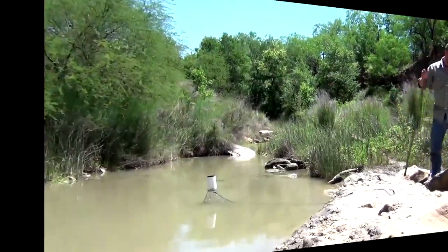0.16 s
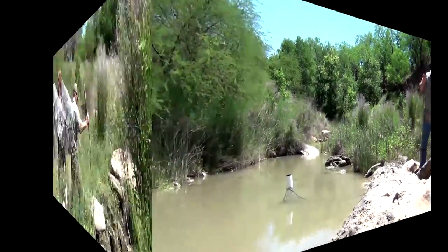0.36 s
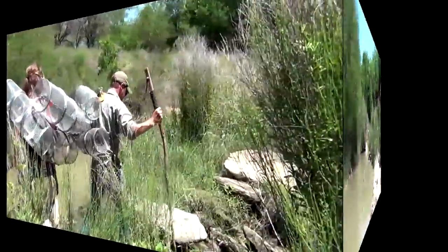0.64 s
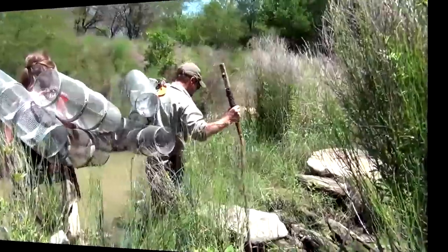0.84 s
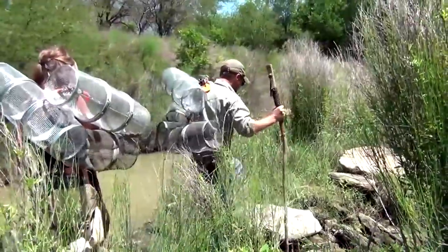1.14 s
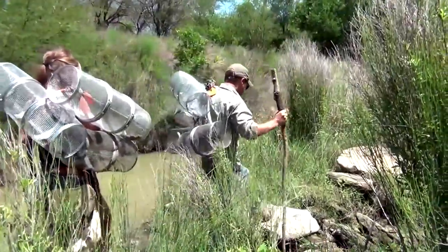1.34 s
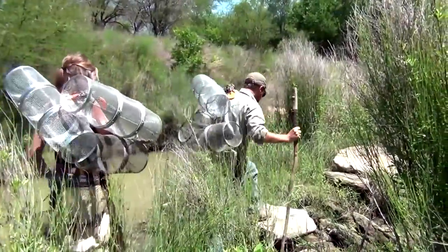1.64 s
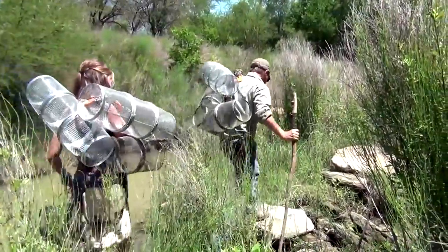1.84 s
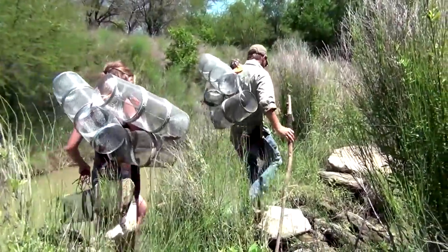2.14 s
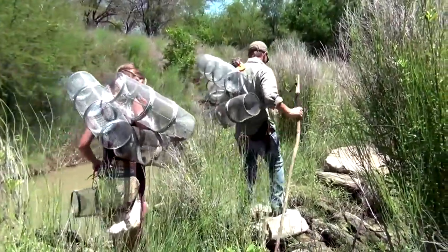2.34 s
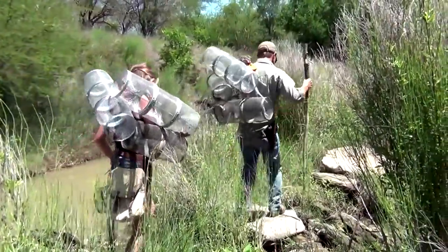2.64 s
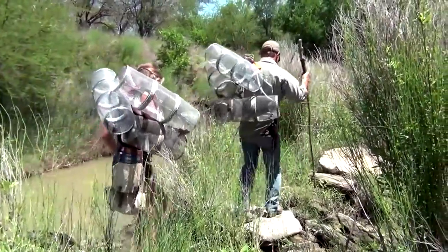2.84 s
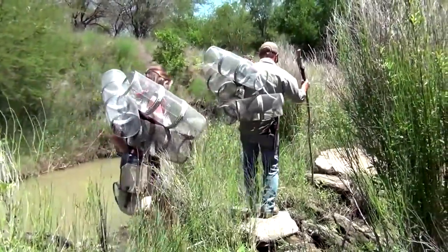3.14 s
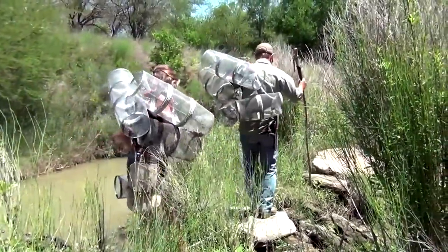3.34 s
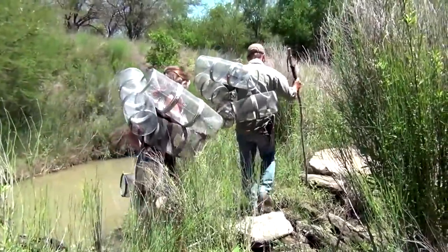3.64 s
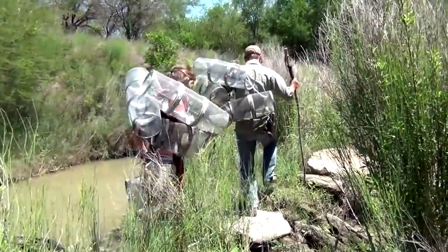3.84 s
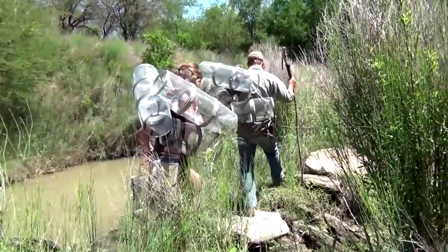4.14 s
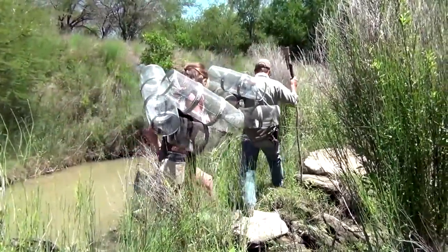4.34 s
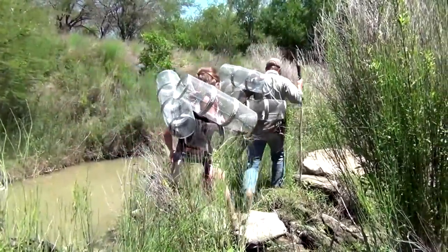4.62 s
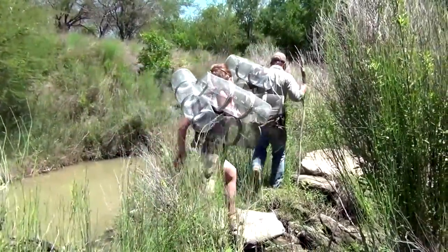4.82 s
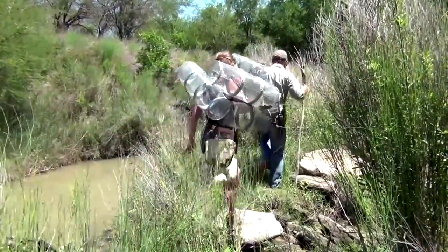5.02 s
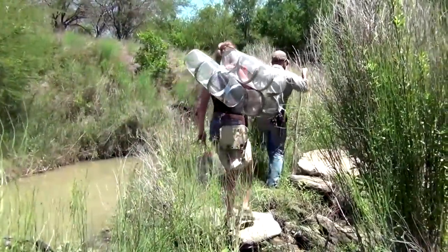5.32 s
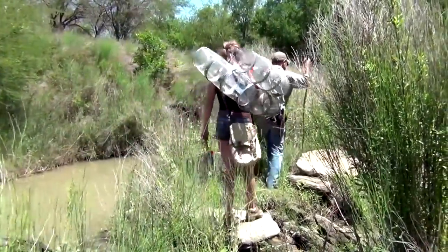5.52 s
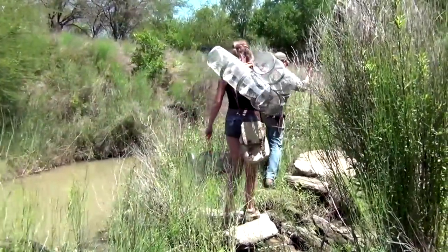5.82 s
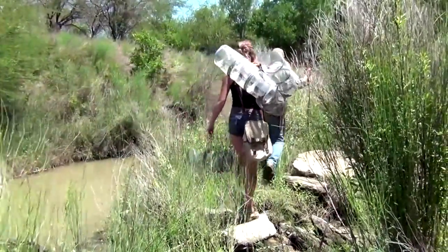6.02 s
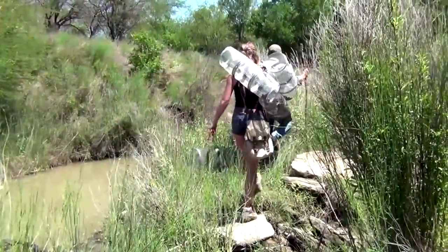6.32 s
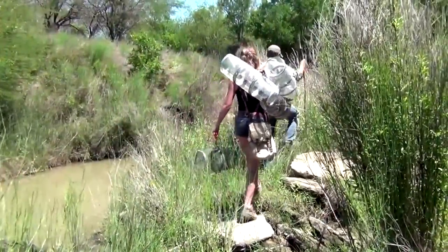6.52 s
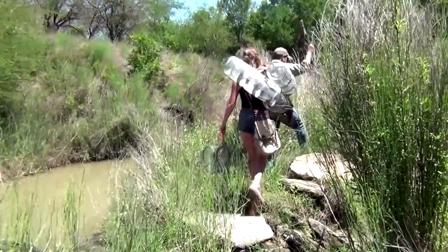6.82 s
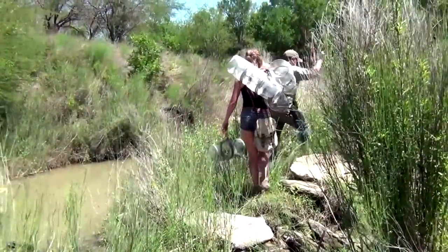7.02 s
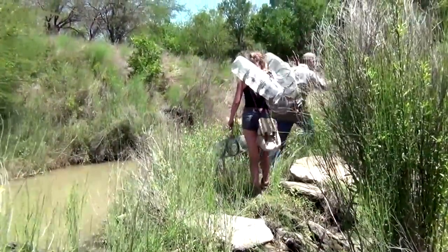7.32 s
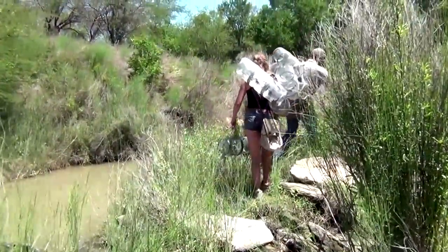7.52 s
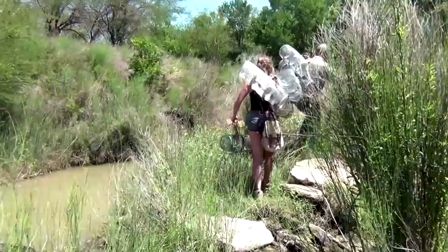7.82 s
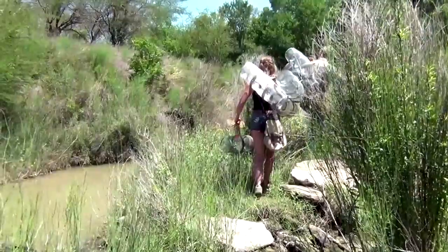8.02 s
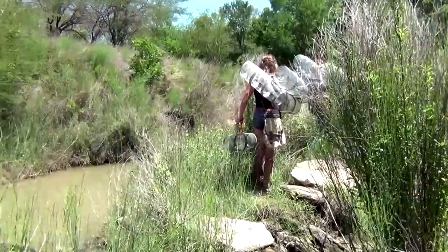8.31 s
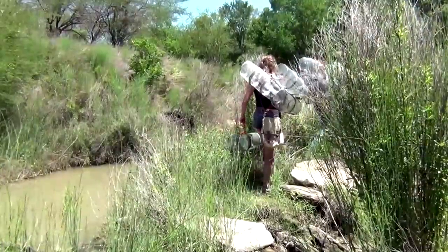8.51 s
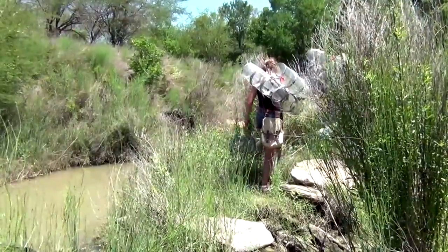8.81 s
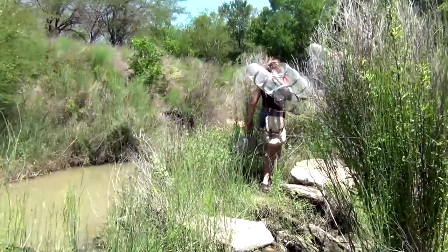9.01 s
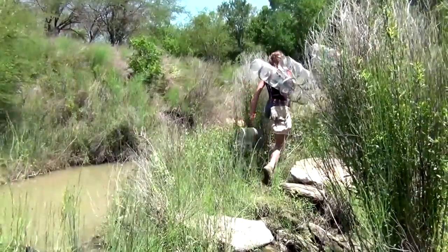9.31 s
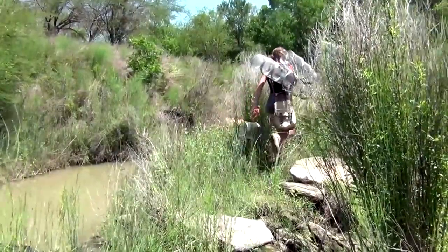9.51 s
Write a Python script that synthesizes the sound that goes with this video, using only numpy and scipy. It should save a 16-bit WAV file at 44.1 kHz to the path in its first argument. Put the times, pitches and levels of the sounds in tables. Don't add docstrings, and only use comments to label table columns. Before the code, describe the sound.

Tall grass rustles and dry twigs crack as people carrying wire traps walk away beside quietly trickling water, with light knocks and faint wind.

```python
import sys
import numpy as np
from scipy import signal
from scipy.fft import rfft, irfft
from scipy.io import wavfile
from scipy.ndimage import uniform_filter1d

SR = 44100
rng = np.random.default_rng(int(sys.argv[2]) if len(sys.argv) > 2 else 0)


def wrap_up_sound(samples):
    columns = np.atleast_2d(samples).T
    tamed = np.clip(columns, -1, 1)
    steps = np.round(tamed * 32767).astype(np.int16)
    wavfile.write(sys.argv[1], SR, steps)


def decibels_to_gain(level_db):
    exponent = np.asarray(level_db, float) / 20
    return 10 ** exponent


N = 425873


def evened(x):
    return x / np.sqrt(np.mean(x ** 2) + 1e-20)


def read(points, hz):
    f, value = np.transpose(points)
    return np.interp(np.log(hz + 1), np.log(f + 1), value)


def curve(rows, axis=1):
    rows = np.array(rows)
    return np.interp(np.arange(N) / SR, rows[:, 0], rows[:, axis])


def lumps(rows):
    t = np.arange(N) / SR
    return sum(decibels_to_gain(db) * np.cos(np.pi * np.clip((t - s) / length, -.5, .5)) ** 2 for s, db, length in rows)


def add(mix, s, sound):
    part = mix[:, round(s * SR):][:, :sound.shape[1]]
    part += sound[:, :part.shape[1]]


def resonate(x, hz, width):
    r = np.exp(-np.pi * width / SR)
    pole = r * np.exp(2j * np.pi * hz / SR)
    return 2 * signal.lfilter([1 - r], [1, -pole], x).real


def coloured(x, spectrum):
    gain = decibels_to_gain(read(spectrum, np.fft.rfftfreq(N, 1 / SR)))
    return evened(irfft(rfft(x) * gain, N))


# (frequency [Hz], likeness [0-1])
PORT_LIKENESS = [(60, 0.67), (180, 0.53), (550, 0.42), (1650, 0.55), (4970, 0.46), (15000, 0.73)]


def hiss(spectrum, size, patch_db, flicker_db):
    frames, hz = 4 * N // size + 5, np.fft.rfftfreq(size, 1 / SR)
    a, b, c, d, patches = rng.standard_normal((frames, len(hz), 5)).T
    patches = uniform_filter1d(patches, size=12, axis=0)
    patches = evened(uniform_filter1d(patches, size=14, axis=1))
    flicker = uniform_filter1d(rng.standard_normal(frames), size=9)
    flicker = evened(uniform_filter1d(flicker, size=9))
    same = np.clip(read(PORT_LIKENESS, hz), -1, 1)[:, None]
    left = a + 1j * b
    right = same * left + np.sqrt(1 - same ** 2) * (c + 1j * d)
    z = np.array([left, right])
    z *= decibels_to_gain(read(spectrum, hz)[:, None] + patch_db * patches + flicker_db * flicker)
    return evened(signal.istft(z, nperseg=size, noverlap=3 * size // 4)[1][:, :N])


def grains(per_s, spread_db, low_hz, high_hz, cycles, glide):
    size = decibels_to_gain(spread_db * np.minimum(rng.exponential(1, N), 4)) * (rng.random(N) < per_s / SR)
    kind, side = rng.integers(0, 24, N), rng.uniform(-.6, .6, N)
    out = np.zeros((2, N))
    for k, hz in enumerate(np.geomspace(low_hz, high_hz, 24)):
        u = np.arange(0, 4 * cycles, hz / SR) / cycles
        chirp = u * np.exp(-2 * u) * np.sin(2 * np.pi * cycles * (u + glide * u ** 2))
        starts = size * (kind == k) * np.array([1 - side, 1 + side])
        out += signal.oaconvolve(starts, chirp[None], axes=1)[:, :N]
    return evened(out)


def blow(peak_db, rings_hz, t60, breadth, crack, rise_s):
    t = np.arange(int(.25 * SR)) / SR
    shared, own = rng.standard_normal(len(t)), rng.standard_normal((2, len(t)))
    noise = (np.sign(shared) + .5 * own) * decibels_to_gain(-60 * t / t60) * (1 - np.exp(-t / rise_s))
    noise = signal.lfilter(*signal.butter(2, 0.42 * min(rings_hz), "high", fs=SR), noise)
    centre = np.mean(rings_hz)
    wide = resonate(resonate(noise, centre, 1.85 * centre), rings_hz[0], 1.7 * centre)
    burst = crack * evened(wide)
    for k, hz in enumerate(rings_hz):
        burst = burst + evened(resonate(wide, hz, breadth * hz)) * 0.67 ** k
    return decibels_to_gain(peak_db) * burst / abs(burst.mean(0)).max()


# (middle [s], rms level [dB], length [s])
SWEEPS = [(0.104, -43, 0.16), (0.927, -44.5, 0.19), (1.712, -41.5, 0.066), (1.885, -41, 0.045),
          (2.02, -43, 0.09), (3.096, -38.5, 0.037), (3.161, -38.5, .04), (3.55, -40, 0.06),
          (3.775, -38.5, .04), (4.885, -39.5, .04), (3.72, -34.5, 0.035), (4.173, -39.5, 0.051),
          (4.371, -36.5, 0.1), (4.49, -39.5, 0.1), (4.922, -40, .025), (4.97, -39, .04),
          (5.011, -39.5, 0.04), (5.416, -45, 0.25), (6.308, -39, 0.018), (6.421, -39, 0.016),
          (6.533, -36.5, 0.075), (6.585, -38, 0.035), (6.7, -35.5, 0.022), (7.18, -28.5, 0.015),
          (7.435, -33.5, 0.13), (7.732, -33, 0.1), (8.278, -46, 0.36), (8.86, -42, 0.27),
          (8.996, -38.5, 0.16), (9.214, -44.5, 0.037), (9.367, -38.5, 0.1), (9.455, -39, 0.047),
          (9.536, -35, 0.032), (9.597, -38.5, 0.048)]
# (middle [s], rms level [dB], length [s])
SURGES = [(2.8, -47, .05), (2.91, -45, .06), (2.97, -44, .05), (3.05, -41, .04), (3.26, -44, .1),
          (3.46, -43, .05), (3.62, -43, .05), (3.685, -40, .025), (3.83, -41, .06), (3.95, -39, .1),
          (4.06, -42, .08), (4.32, -43, .06), (4.63, -39, .06), (4.78, -43, .05), (5.11, -44, .03),
          (6.212, -41, .012), (6.55, -45, .05)]


def tufts(blades):
    mix = np.zeros((2, N))
    blades = np.roll(blades, SR // 20, axis=1)
    for rows, hz in [(SWEEPS, 9300), (SURGES, 5200)]:
        for s, db, length in rows:
            start = round((s - 0.42 * length) * SR)
            tuft = blades[:, start:][:, :round(length * SR)]
            tuft = evened(resonate(tuft, hz, 0.77 * hz) + .3 * tuft)
            swell = np.sin(np.pi * np.linspace(0, 1, tuft.shape[1]) ** 0.71) ** 2
            add(mix, start / SR, decibels_to_gain(db) * tuft * swell)
    return mix


# (time [s], effort level [dB], dryness of the blades met [0-1])
GRASS = [(0, -45, 1), (1.0, -46.5, 0.4), (1.4, -47, 0.75), (2.7, -47, 0.4), (2.95, -42.5, 0),
         (3.41, -43, 0.3), (3.8, -39.5, 0), (4.3, -39, 0.2), (4.62, -36.5, 0.82), (5.0, -40, 1),
         (5.5, -47.5, 0.28), (6.0, -47.5, 0.66), (6.4, -42.5, 0.98), (6.94, -44, 0.65), (7.32, -36.5, 0.87),
         (7.83, -45.5, 0.8), (8.5, -52, 0.53), (9.66, -42, 0.6)]
# (frequency [Hz], level [dB per Hz])
BLADES = [(880, -15.5), (1500, -4.5), (2860, -3), (3450, -5.5), (4290, -4), (7170, -3.5), (8660, -3),
          (12200, -10), (13400, -26), (14900, -25), (16000, -36)]
# (frequency [Hz], level [dB per Hz])
STALKS = [(1200, -25), (1900, -19), (2300, 1), (2520, 3.5), (2900, 0.5), (3300, -0.5), (5000, -20.5)]
# (frequency [Hz], level [dB per Hz])
SIZZLE = [(8000, -36), (11000, -2.5), (13000, 4), (15500, -2), (16500, -30)]


def grass():
    crackle = coloured(grains(1500, 0.91, 2530, 12600, 2.54, .0),
                       [(1500, -21), (4000, 1), (9000, 10.0), (12000, 6.0), (15000, -14)])
    fine = evened(hiss(BLADES, size=256, patch_db=2.0, flicker_db=1.3) + .5 * crackle)
    effort_db, dryness = curve(GRASS), curve(GRASS, axis=2)
    stalk_db = -4 - 12.5 * dryness - 0.49 * (effort_db + 46)
    sizzle_db = -21.5 + 11.5 * dryness - 0.23 * (effort_db + 46)
    coarse = decibels_to_gain(stalk_db) * hiss(STALKS, size=256, patch_db=-1.0, flicker_db=1.5)
    sizzle = hiss(SIZZLE, size=256, patch_db=1.5, flicker_db=2.2)
    thinned = fine - 0.35 * dryness ** 2 * resonate(fine, 3840, 3900)
    fade_in = np.minimum(np.arange(N) / SR / 0.078, 1) ** 2
    steady = decibels_to_gain(effort_db) * (thinned + coarse + decibels_to_gain(sizzle_db) * sizzle) * fade_in
    return steady + tufts(fine + 0.052 * crackle + 0.33 * sizzle)


# (time [s], peak level [dB], ring [Hz])
TICKS = [(0.2754, -30, 9220), (0.3925, -20, 5740), (1.5234, -28, 4620), (1.5833, -30, 5140),
         (3.0944, -27, 6450), (3.2251, -31, 6550), (3.3243, -30, 7690), (3.6282, -30, 6250),
         (3.8124, -27, 6410), (4.1649, -27, 9780), (4.372, -25, 9910), (4.4444, -24, 6940),
         (4.4774, -26, 6140), (4.5994, -27, 6220), (4.9631, -26, 9000), (5.0104, -29, 8490),
         (5.1048, -36, 6120), (6.3051, -25, 8590), (6.4214, -24, 7170), (6.5151, -25, 9090),
         (6.577, -24, 12100), (6.5869, -25, 5410), (6.6164, -26, 8000), (6.6314, -32, 9790),
         (7.7044, -27, 8880), (7.7284, -23, 11600), (7.7404, -23, 5530), (7.7534, -24, 6520),
         (8.9944, -23, 8770)]


def springing_blades():
    mix = decibels_to_gain(curve(GRASS) - 11) * grains(600, 3.2, 5000, 12000, 1.6, .0)
    for s, db, hz in TICKS:
        add(mix, s, blow(db - 2.5, [hz], .008, breadth=.1, crack=1.5, rise_s=.0002))
    return mix


def pop(peak_db, hz, t60):
    t = np.arange(int(.02 * SR)) / SR
    ring = np.sin(2 * np.pi * hz * t) * decibels_to_gain(peak_db - 60 * t / t60) * np.minimum(2 * hz * t, 1)
    left, right = ring + 0.17 * np.roll(ring, 31), ring + 0.54 * np.roll(ring, 38)
    return np.array([left, right]) * decibels_to_gain([[-2.2], [1.1]])


# (time [s], peak level [dB], ring [Hz])
SNAPS = [(0.1114, -28, 10900), (0.2884, -31, 4150), (0.3930, -26, 10000), (0.5886, -28, 6430),
         (3.684, -39, 9760), (3.8367, -24, 8570), (4.472, -22, 11000), (5.1054, -29, 6130),
         (6.269, -31, 10100), (6.3722, -26, 11900), (6.4047, -27, 10500), (6.4147, -24, 9500),
         (6.6915, -21, 8000), (6.9711, -35, 5680),
         (7.1322, -25, 8630), (7.1924, -29, 7960), (7.3564, -25, 6210), (7.3904, -28, 8830),
         (7.4051, -18, 9130), (7.416, -20.5, 9370), (7.6985, -22, 8000), (7.855, -32, 9130),
         (8.2815, -28, 9960), (8.6682, -30, 11600), (8.738, -32, 10700), (9.001, -29, 5330),
         (9.4384, -28, 8470), (9.5225, -21.5, 8380), (9.581, -25, 8160)]
# (time [s], peak level [dB], ring [Hz], second ring [Hz], t60 [s])
CRACKS = [(7.149, -30, 11000, 9000, .015), (7.2434, -22, 9100, 5000, 0.016),
          (7.1706, -17, 6500, 8800, 0.0097), (7.1785, -19, 9000, 5800, 0.024),
          (7.2508, -15, 8640, 6000, 0.016), (7.2706, -18.5, 6140, 10500, 0.0071),
          (7.3502, -10, 8600, 6600, 0.019), (7.3506, -18, 13000, 5200, 0.014),
          (7.3848, -15, 9350, 13000, 0.008), (7.783, -27, 11000, 2500, 0.025)]
# (time [s], peak level [dB], ring [Hz], t60 [s])
POPS = [(1.5542, -6.5, 4500, 0.003), (1.5543, -7, 3200, .003), (5.1304, -29, 1400, .006),
        (7.35, -19, 4400, .008), (7.352, -26, 1600, .02), (1.5612, -19, 2400, .015),
        (1.558, -17, 1800, .018), (1.5565, -23, 560, .025), (7.146, -26, 1500, .018),
        (7.2504, -25, 3000, .004), (7.1715, -30, 3500, .004), (6.4152, -23, 7400, .004),
        (6.4154, -26, 3800, .006), (6.4153, -26, 5400, .005), (6.6922, -23, 4300, .004),
        (6.6921, -23, 9300, .005), (7.1328, -25, 1600, .012), (5.1302, -15, 4300, 0.002),
        (5.1303, -27, 2600, .002), (7.3846, -3.5, 9500, 0.0056), (7.3847, -11, 6300, 0.01),
        (7.3497, -6, 7200, .011), (1.5235, -17, 800, .008), (1.5243, -17, 1500, .007),
        (1.5548, -28, 8500, .008), (.3936, -20, 10800, .004), (.2975, -28, 900, .006),
        (6.2695, -18, 9000, .0018), (6.3012, -26, 3100, .012), (6.3628, -30, 5500, .003),
        (6.3725, -15.5, 12000, .0025), (1.5845, -27, 5200, .008), (7.1712, -19, 6600, .008),
        (7.171, -13, 8900, .01), (7.2498, -4, 9500, .002), (7.2502, -24, 4300, .004),
        (7.7826, -17, 2300, .002), (5.1299, -22, 8700, .006), (7.7827, -7.5, 4560, 0.00088),
        (7.7822, -24, 1000, .003), (8.8452, -18.5, 8430, 0.0081), (8.8638, -12.5, 11600, 0.0035)]


def breaking_stems():
    mix = np.zeros((2, N))
    for s, db, hz in SNAPS:
        add(mix, s + .0006, blow(db, [hz], 0.014, breadth=0.064, crack=4.1, rise_s=0.00018))
    for s, db, hz, second_hz, t60 in CRACKS:
        add(mix, s, blow(db, [hz, second_hz], t60, breadth=0.069, crack=0.54, rise_s=.0001))
    for s, *row in POPS:
        add(mix, s, pop(*row))
    return mix


def strike(peak_db, modes, longest_s):
    t = np.arange(int(.2 * SR)) / SR
    ring = np.zeros(len(t))
    for k, (hz, db, t60) in enumerate(modes):
        ring += (-1) ** k * decibels_to_gain(db - 60 * t / min(t60, longest_s)) * np.sin(2 * np.pi * hz * t)
    jolts = rng.standard_normal((2, len(t)))
    chatter = (0.83 * jolts + 0.27 * jolts[::-1]) * decibels_to_gain(-17 - 60 * t / 0.057) + (t == 0)
    sound = signal.fftconvolve(chatter, ring[None], axes=1)
    sound[:, :len(t)] *= 1 - np.exp(-t / 0.0006)
    sound *= decibels_to_gain([[-2.0], [1.0]])
    return decibels_to_gain(peak_db) * sound / abs(sound.mean(0)).max()


# (time [s], peak level [dB])
FIRST_BLOW = (.6005, -19.5)
SECOND_BLOW = (1.554, -12)
# (frequency [Hz], level [dB], t60 [s])
FIRST_WOOD = [(357, -9, 0.063), (630, -7, 0.059), (710, -14, 0.06), (912, 1, 0.043), (1100, 3.5, 0.034),
              (1337, 4.5, 0.038), (2300, -16, 0.046), (2700, -6, .03)]
SECOND_WOOD = [(397, -14, .06), (1006, -2, 0.06), (1200, -12, 0.047), (1415, 9.5, 0.016), (1680, -4, 0.051),
               (1950, -3.5, 0.03), (2500, -8, 0.038), (3130, -3.5, 0.034)]


def stick():
    mix = np.zeros((2, N))
    add(mix, FIRST_BLOW[0], strike(FIRST_BLOW[1], FIRST_WOOD, longest_s=.12))
    add(mix, SECOND_BLOW[0], strike(SECOND_BLOW[1], SECOND_WOOD, longest_s=.055))
    return mix


def thud(peak_db, hz, t60):
    t = np.arange(int(.25 * SR)) / SR
    ring = np.sin(2 * np.pi * hz * t)
    ring += 0.54 * np.sin(2 * np.pi * hz * rng.uniform(0.65, 0.807) * t)
    ring *= decibels_to_gain(-60 * t / t60) * (1 - np.exp(-t / 0.0025))
    ring = signal.lfilter(*signal.butter(2, .5 * hz, "high", fs=SR), ring)
    return decibels_to_gain(peak_db) * np.array([ring, ring]) / abs(ring).max()


# (time [s], peak level [dB], ring [Hz], t60 [s])
KNOCKS = [(.29, -23.5, 1570, 0.051), (.594, -31, 1600, 0.057), (1.525, -22, 1000, 0.056),
          (1.546, -29, 2500, 0.07), (1.558, -18.5, 2100, 0.062), (2.2, -38, 4580, .012),
          (0.69, -50, 3700, .04), (2.159, -40, 1710, 0.038), (1.585, -31.5, 2376, 0.28),
          (6.3, -35, 2600, 0.015), (7.132, -26.5, 900, 0.05), (7.143, -26.5, 950, 0.085),
          (.602, -26, 710, 0.052), (7.255, -30, 1700, 0.034), (7.35, -23.5, 1491, 0.031),
          (7.39, -28, 2300, 0.014), (8.29, -38, 1800, 0.09), (9.522, -37, 900, 0.055)]
# (time [s], peak level [dB], ring [Hz])
TAPS = [(0.714, -36, 1070), (1.142, -39, 1520), (1.165, -36, 1620), (1.699, -34, 773), (1.95, -33, 2790),
        (2.794, -37, 2510), (2.902, -36, 2480), (5.104, -32, 2820), (5.139, -34, 1580), (5.388, -34, 2340),
        (5.863, -38, 611), (5.901, -35.5, 598), (6.3, -35, 713), (6.52, -32, 1420), (6.579, -34, 1350),
        (6.616, -36, 795), (6.644, -36, 1080), (6.672, -35, 1050), (6.908, -34, 1640), (7.108, -33, 1590),
        (8.219, -37, 888), (8.294, -35, 1700), (8.34, -32, 1870), (8.38, -32, 1500), (8.454, -41, 616),
        (8.574, -38, 1820), (8.633, -37, 1110), (8.704, -37, 1990), (8.783, -38, 2350), (8.863, -39, 2460),
        (9.083, -39, 821), (9.182, -37, 2440)]
# (time [s], peak level [dB], ring [Hz], t60 [s])
THUDS = [(.148, -40, 253, 0.079), (.288, -41, 396, 0.074), (0.602, -37.5, 201, 0.069),
         (1.439, -28.5, 197, 0.031), (1.576, -34.5, 134, 0.13), (1.871, -40.5, 392, 0.1),
         (2.135, -42.5, 420, 0.073), (2.527, -34, 194, 0.061), (3.176, -19, 243, 0.044),
         (3.188, -25, 276, 0.067), (3.224, -37, 278, .06), (3.322, -42, 228, 0.081),
         (3.796, -44, 324, 0.067), (4.45, -43, 342, 0.16), (4.869, -47, 297, 0.061), (5.1, -52, 240, 0.091),
         (6.199, -45, 227, .15), (6.25, -44, 228, .12), (6.305, -47, 420, .06), (6.375, -44, 225, .1),
         (6.42, -42, 430, 0.065), (6.299, -38, 300, 0.044), (6.407, -44, 252, 0.089), (7.138, -36, 282, .1),
         (8.319, -47, 199, 0.1), (9.379, -42, 333, 0.081)]


def traps_and_packs():
    mix = np.zeros((2, N))
    for s, db, hz, t60 in KNOCKS:
        add(mix, s, blow(db, [hz], t60, breadth=0.23, crack=2.6, rise_s=0.00037))
    for s, db, hz in TAPS:
        add(mix, s, blow(db - 5, [hz], .045, breadth=0.076, crack=0.44, rise_s=.001))
    for s, *row in THUDS:
        add(mix, s, thud(*row))
    return mix


def air_noise():
    air = rng.standard_normal((3, N))
    return 0.74 * air[0] + 0.66 * air[1:]


# (time [s], level [dB])
DRAG = [(1.7, -80), (1.95, -56), (2.5, -56), (2.8, -53), (3.3, -53), (3.7, -53), (4.6, -52.5), (4.9, -72),
        (5.2, -80)]
# (frequency [Hz], width [Hz], level [dB])
TUBES = [(2480, 120, 1), (2776, 160, -2), (6600, 500, -3), (8600, 500, -6)]


def singing_tubes():
    air = air_noise()
    tubes = np.zeros((2, N))
    for hz, width, db in TUBES:
        tubes += decibels_to_gain(db) * evened(resonate(resonate(air, hz, width), hz, width))
    return decibels_to_gain(curve(DRAG)) * evened(tubes)


# (time [s], level [dB])
INSECT = [(0, -56), (.1, -53.5), (.9, -52), (1.5, -53), (1.9, -55), (2.3, -58), (2.7, -66), (3.2, -75)]


def insect():
    wing_hz, arch_hz, wobble_hz, rasp_width_hz, strokes_hz = 8900, 330, 420, 450, 66.4
    turn = 2 * np.pi * strokes_hz * np.arange(N) / SR - 2.3
    air = rng.standard_normal(N)
    pitch_hz = wing_hz + arch_hz * np.cos(turn) + wobble_hz * air
    whistle = np.sin(2 * np.pi * np.cumsum(pitch_hz) / SR)
    rasp = evened(resonate(resonate(air, wing_hz, rasp_width_hz), wing_hz, rasp_width_hz))
    waver_db = 1.1 * evened(uniform_filter1d(uniform_filter1d(air, size=4000), size=4000))
    buzz = evened((whistle + 0.3 * rasp) * (.5 + .5 * np.cos(turn)) ** 0.75)
    return decibels_to_gain(curve(INSECT) + waver_db) * buzz * decibels_to_gain([[1.5], [-1.5]])


# (time [s], water level [dB])
CREEK = [(0, -50), (.3, -47.5), (.8, -47), (1.18, -50.5), (5.7, -50.5), (9.66, -49.5)]
# (frequency [Hz], level [dB per Hz])
WASH = [(180, -37), (300, -7), (541, -4.5), (605, 0.5), (653, 1), (818, 0), (962, -1.5), (1440, -2.5),
        (1850, -2.5), (3590, -21.5), (6000, -18), (7800, -28), (13200, -120)]
# (frequency [Hz], level [dB per Hz])
SHUFFLE = [(70, -29), (130, -9), (250, 0.5), (400, -2), (600, -2), (1000, -43)]
# (middle [s], level [dB])
STEPS = [(.32, -54), (.9, -58), (1.6, -58), (2.3, -59), (3.2, -65), (4.5, -75), (5.2, -61), (7.2, -61),
         (7.75, -66), (9.25, -65)]


def creek_and_feet():
    wash = hiss(WASH, size=512, patch_db=2.0, flicker_db=1.0)
    water = evened(wash + 0.5 * grains(260, 3.3, 604, 2840, 6.14, 0.052))
    soil = hiss(SHUFFLE, size=1024, patch_db=3.5, flicker_db=-0.5)
    feet = lumps((s, db, 0.86) for s, db in STEPS)
    return (decibels_to_gain(curve(CREEK)) + 0.23 * feet) * water + (decibels_to_gain(-60) + feet) * soil


def bubble(peak_db, hz, cycles):
    u = np.arange(int(.15 * SR)) / SR * hz / cycles
    swell = np.e * 2 * u * np.exp(-2 * u)
    tone = np.sin(2 * np.pi * cycles * (.96 * u + 0.032 * u ** 2)) * swell
    return decibels_to_gain(peak_db) * np.array([tone, tone])


def gulp(peak_db, from_hz, to_hz, length):
    u = np.linspace(0, 1, round(length * SR))
    cycles = length * (from_hz * u + .5 * (to_hz - from_hz) * u ** 2)
    tone = np.sin(2 * np.pi * cycles) * np.sin(np.pi * u ** 0.48)
    return decibels_to_gain(peak_db) * np.array([tone, tone])


# (time [s], peak level [dB], pitch [Hz])
BUBBLES = [(0.766, -44, 1760), (0.9, -37.5, 1850), (1.231, -42, 2100), (1.465, -39, 1710),
           (1.63, -36.5, 2700), (2.017, -41, 1830), (2.157, -45, 1840), (5.754, -42.5, 1890),
           (5.997, -40, 1660), (7.218, -42, 916), (7.289, -43, 877), (7.409, -37.5, 1100),
           (7.517, -42, 2160), (7.629, -35, 835), (7.883, -42, 2570), (7.997, -40, 1900), (8.16, -43, 1840),
           (8.38, -44, 1530), (8.345, -43, 1870), (8.95, -43, 880), (9.256, -38, 1950), (9.306, -41, 1750),
           (9.445, -44, 2650)]
# (time [s], peak level [dB], from [Hz], to [Hz], length [s])
GULPS = [
    (8.245, -48, 930, 1080, 0.058),
    (8.952, -40, 860, 1080, 0.037),
    (8.95, -47, 1600, 1820, .02),
    (6.21, -49, 800, 850, 0.053),
    (6.03, -50, 1000, 1100, .03),
]
# (time [s], level [dB])
HOLLOW = [(0, -58), (.95, -57), (1.1, -65), (4.2, -64), (4.8, -61), (9.66, -64)]


def near_water():
    mix = decibels_to_gain(curve(HOLLOW)) * evened(resonate(air_noise(), 610, 28))
    for s, db, hz in BUBBLES:
        add(mix, s, bubble(db, hz, cycles=9.5))
    for s, *row in GULPS:
        add(mix, s, gulp(*row))
    return mix


# (time [s], level [dB])
WIND = [(0, -58), (1.05, -59), (1.15, -60), (2.2, -61.5), (3.6, -63.5), (9.66, -60.5)]
# (middle [s], level [dB], length [s])
PUFFS = [(.3, -61, 0.14), (1.45, -52, .1), (1.58, -45, 0.1), (2.41, -56, 0.12), (2.55, -53, 0.12),
         (3.2, -60, 0.28), (6.56, -54, 0.13), (6.78, -51, 0.15), (6.93, -43.5, 0.17), (7.07, -44.5, 0.24),
         (7.32, -57, 0.2), (7.65, -48.5, 0.21), (9.41, -52, 0.12)]
# (frequency [Hz], level [dB per Hz])
GUST = [(8.8, -42), (15, -4.5), (40, -7.5), (59, 0), (119, -11), (184, -11.5), (275, -19), (300, -10),
        (390, -46), (660, -120)]


def wind():
    return (decibels_to_gain(curve(WIND)) + lumps(PUFFS)) * hiss(GUST, size=2048, patch_db=0.85, flicker_db=2.5)


def scene():
    walkers = grass() + springing_blades() + breaking_stems() + stick() + traps_and_packs() + singing_tubes()
    return walkers + insect() + creek_and_feet() + near_water() + wind()


def band_limit(x):
    return signal.sosfilt(signal.butter(12, 16100, fs=SR, output="sos"), x)


# (frequency [Hz], left minus right [dB])
PORTS = [(60, -13), (130, -10.5), (250, -11), (400, -10), (600, 0), (1100, -4.5), (1700, -0.5), (2200, -3),
         (2600, -1), (3500, -6.5), (6000, -2), (8000, -3.5), (12000, -9), (16000, -13)]


def record(dry):
    hz = np.fft.rfftfreq(N, 1 / SR)
    left = decibels_to_gain(read(PORTS, hz))
    ports = 2 * np.array([left, np.ones(len(hz))]) / (1 + left)
    band = np.clip((15950 - hz) / 150, 0, 1)
    return band_limit(irfft(rfft(dry) * ports * band, N))


dry = scene()
out = record(dry)
wrap_up_sound(out)
```